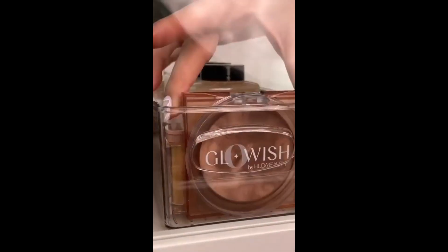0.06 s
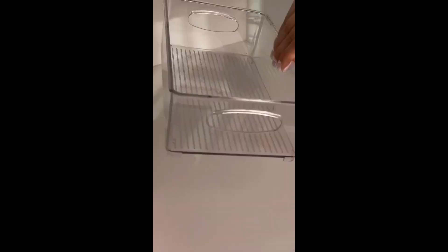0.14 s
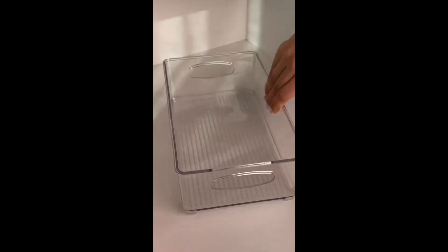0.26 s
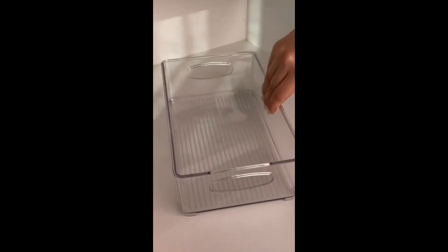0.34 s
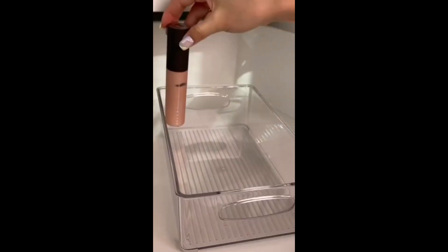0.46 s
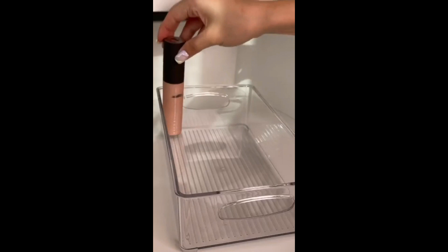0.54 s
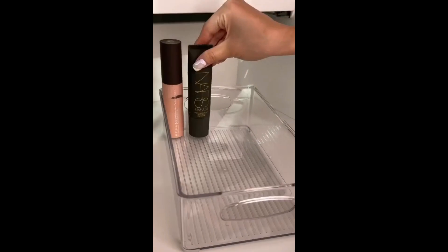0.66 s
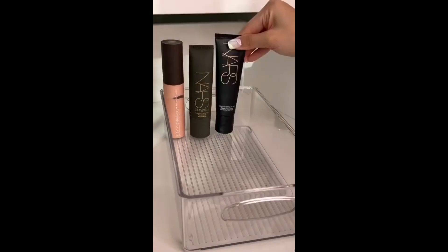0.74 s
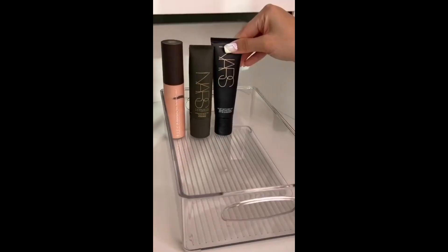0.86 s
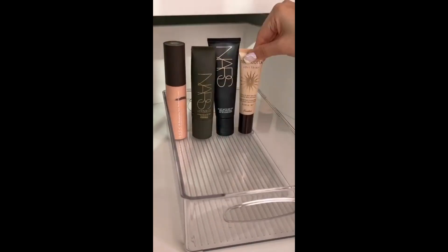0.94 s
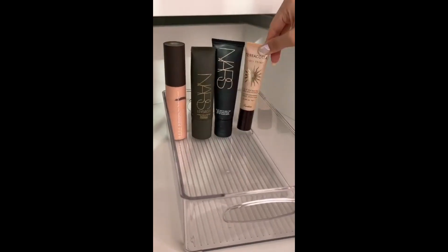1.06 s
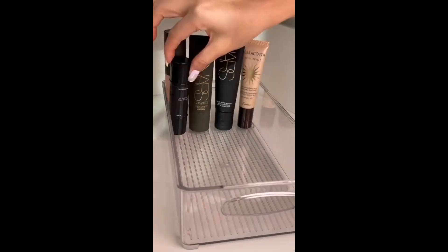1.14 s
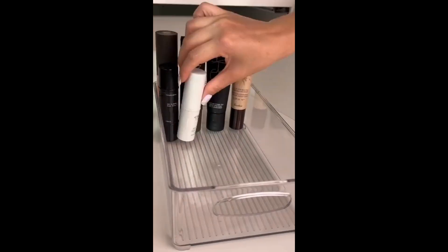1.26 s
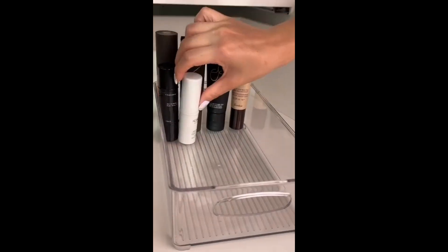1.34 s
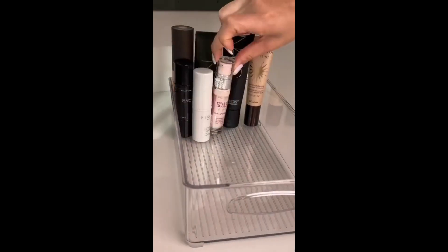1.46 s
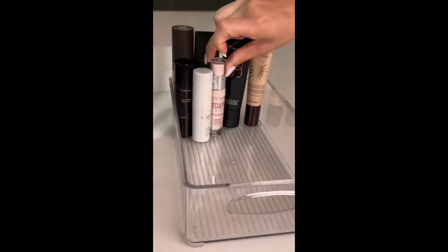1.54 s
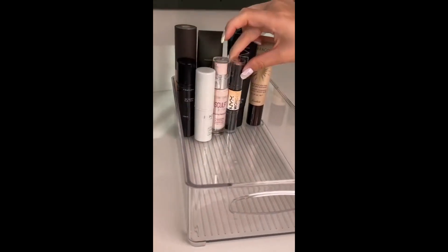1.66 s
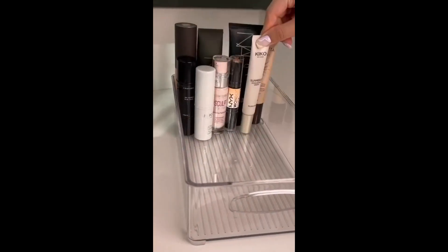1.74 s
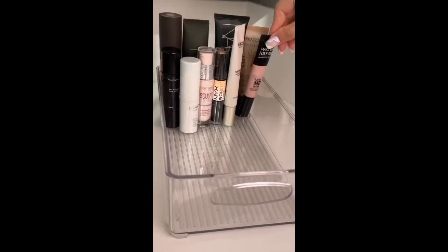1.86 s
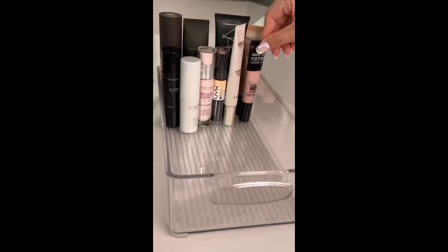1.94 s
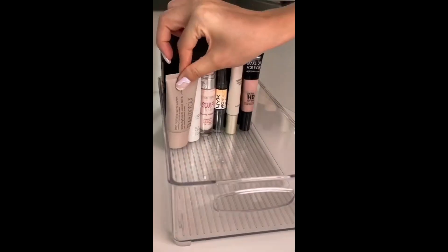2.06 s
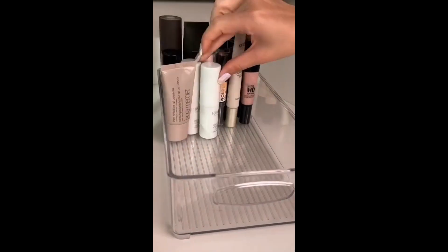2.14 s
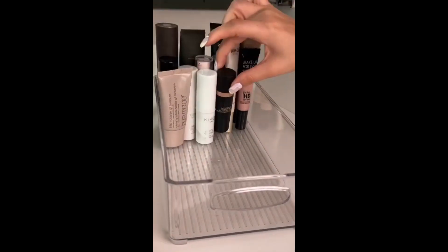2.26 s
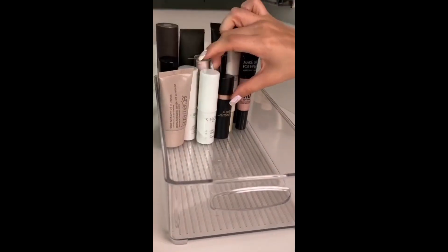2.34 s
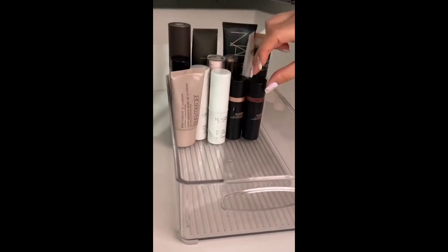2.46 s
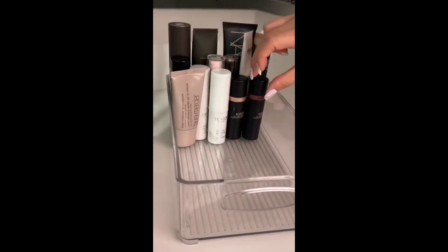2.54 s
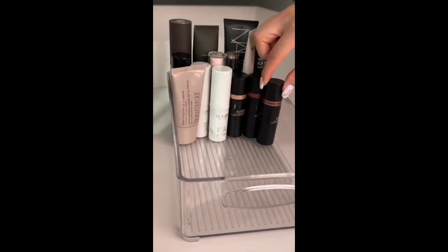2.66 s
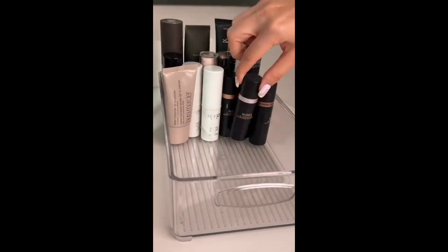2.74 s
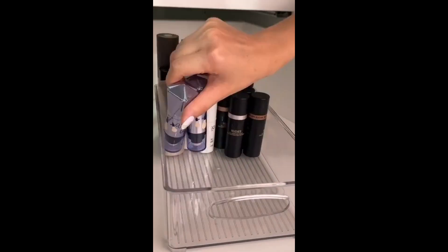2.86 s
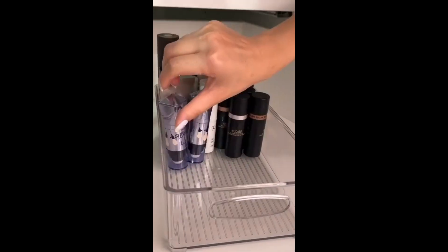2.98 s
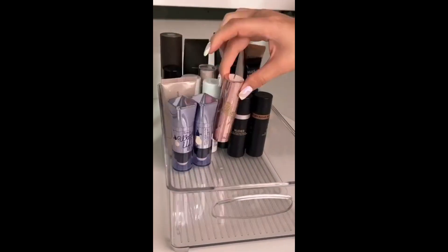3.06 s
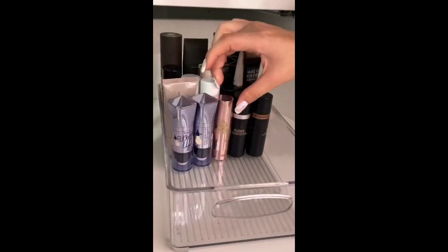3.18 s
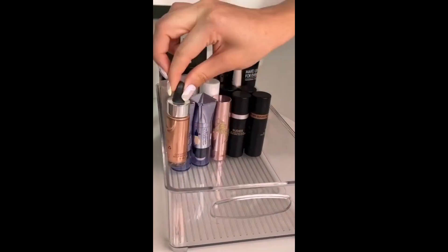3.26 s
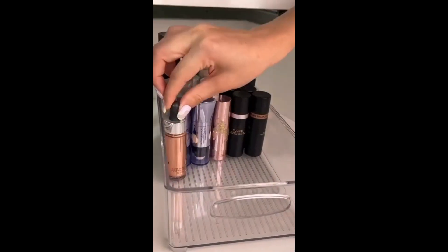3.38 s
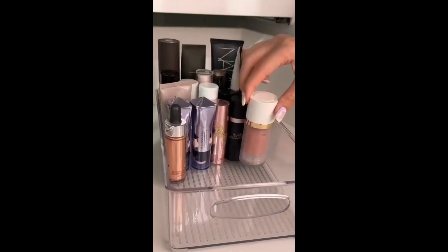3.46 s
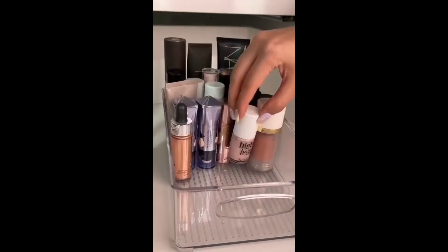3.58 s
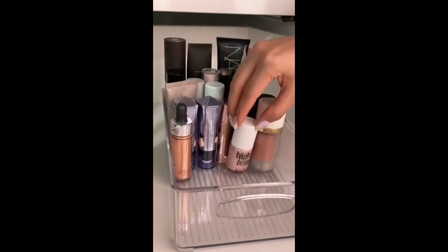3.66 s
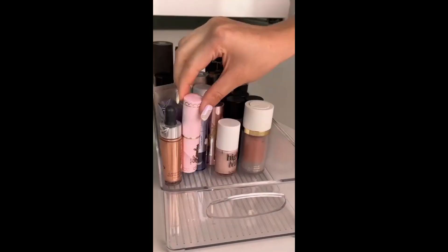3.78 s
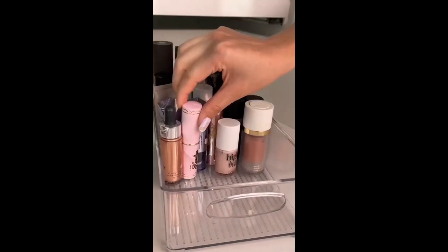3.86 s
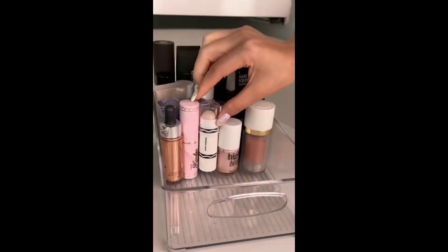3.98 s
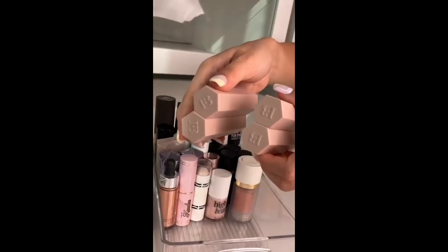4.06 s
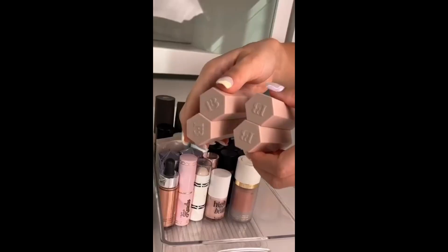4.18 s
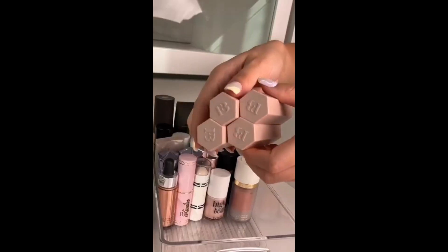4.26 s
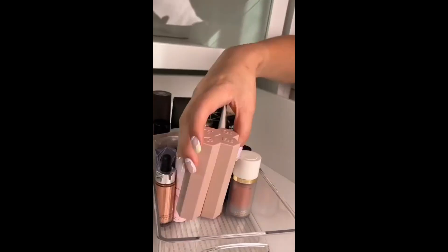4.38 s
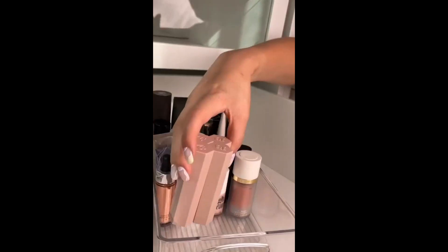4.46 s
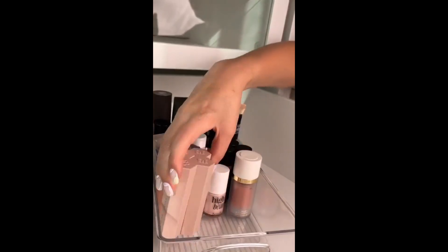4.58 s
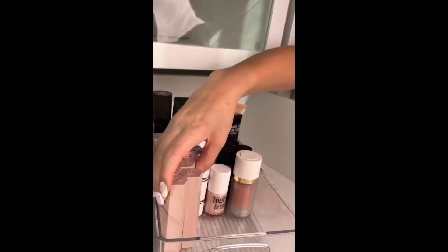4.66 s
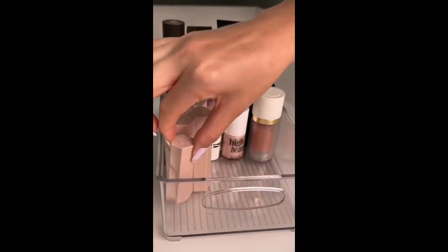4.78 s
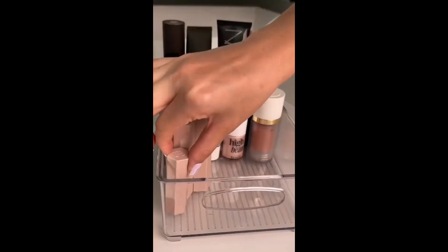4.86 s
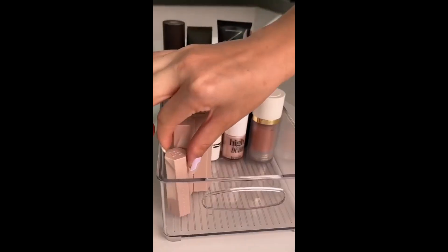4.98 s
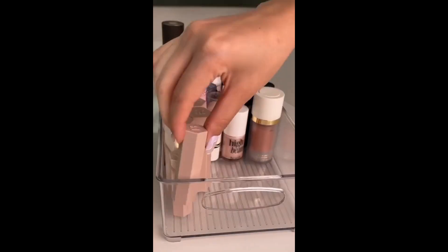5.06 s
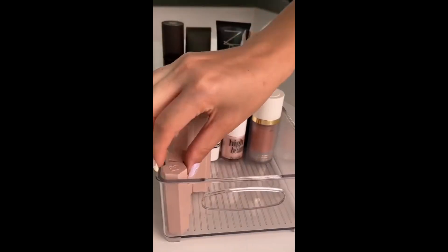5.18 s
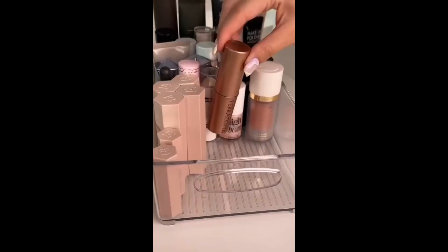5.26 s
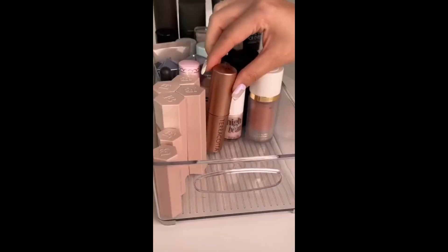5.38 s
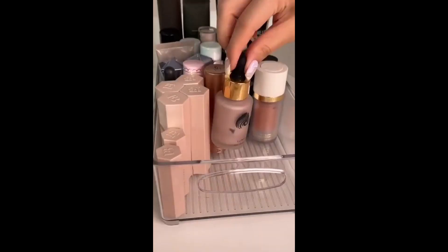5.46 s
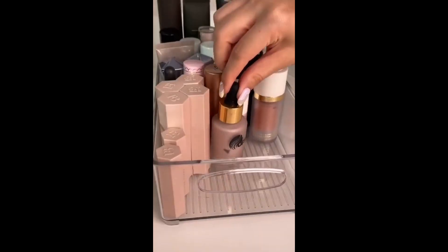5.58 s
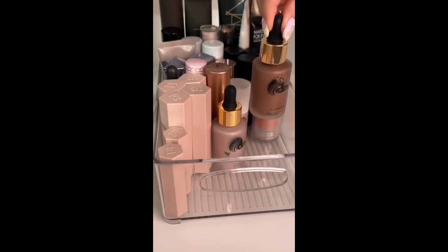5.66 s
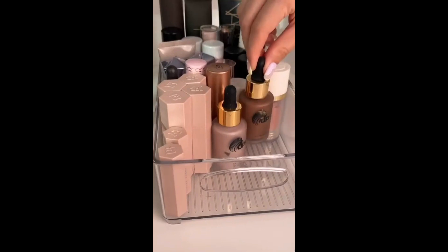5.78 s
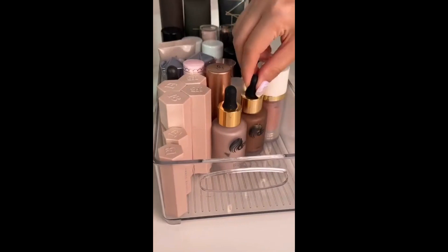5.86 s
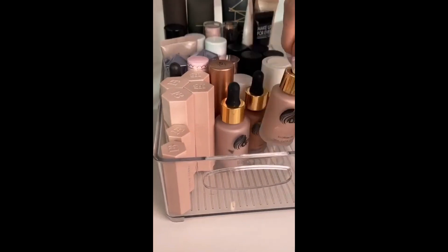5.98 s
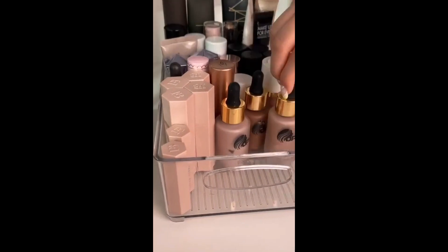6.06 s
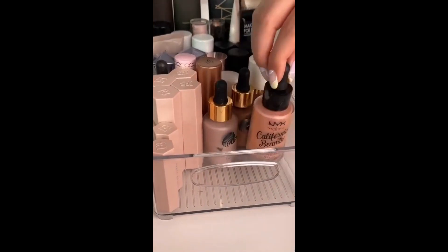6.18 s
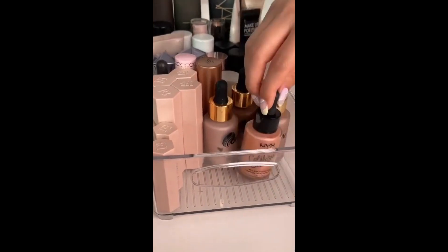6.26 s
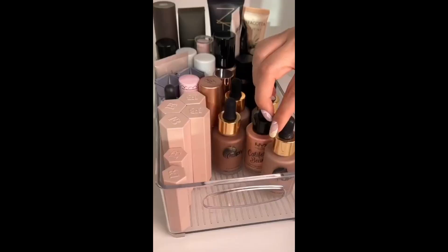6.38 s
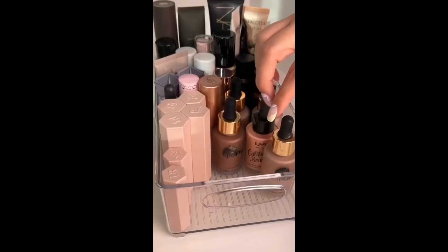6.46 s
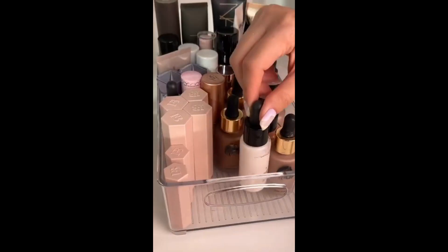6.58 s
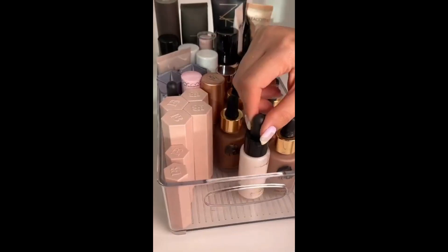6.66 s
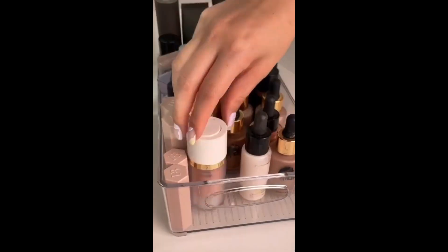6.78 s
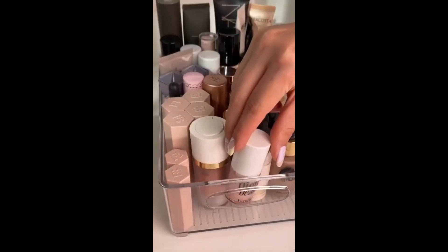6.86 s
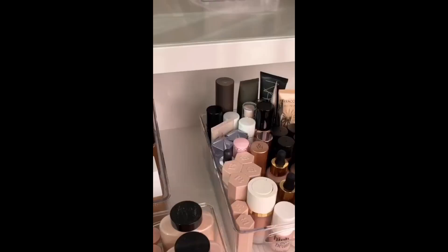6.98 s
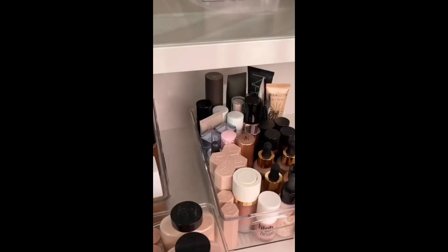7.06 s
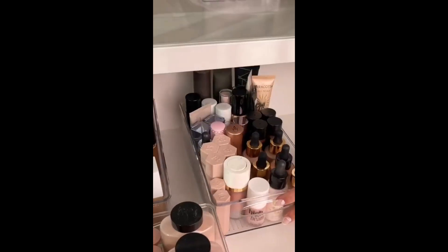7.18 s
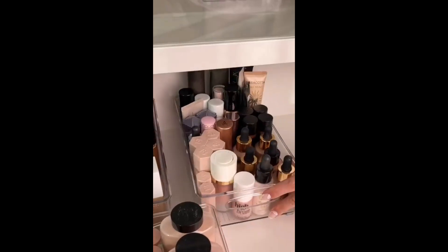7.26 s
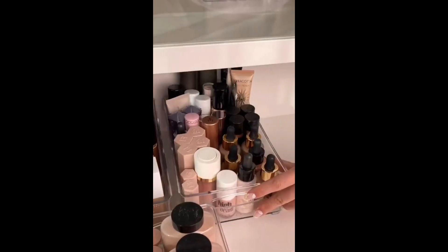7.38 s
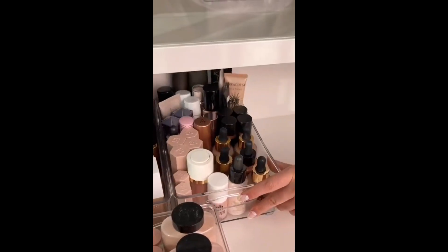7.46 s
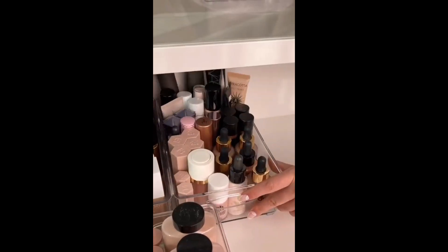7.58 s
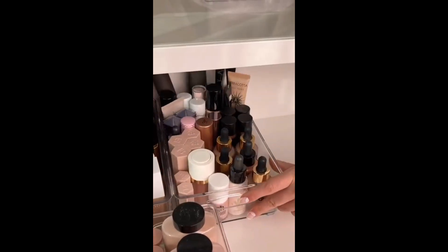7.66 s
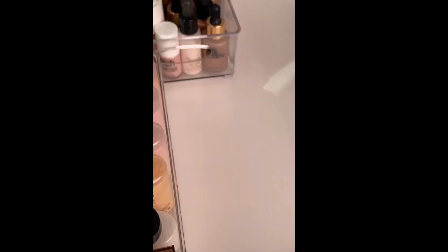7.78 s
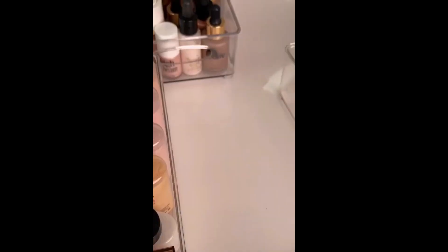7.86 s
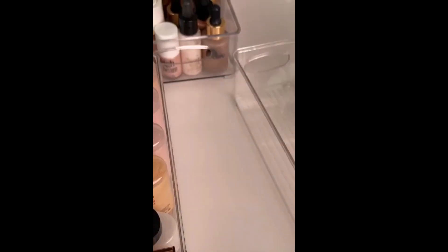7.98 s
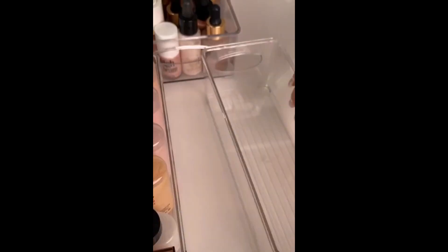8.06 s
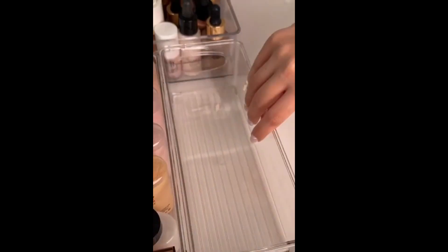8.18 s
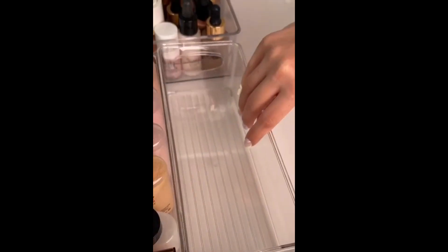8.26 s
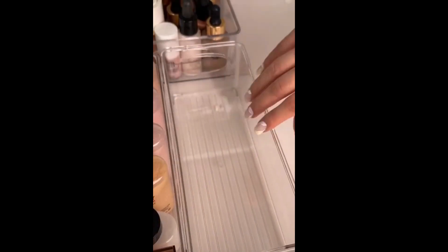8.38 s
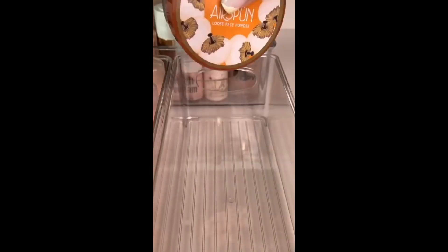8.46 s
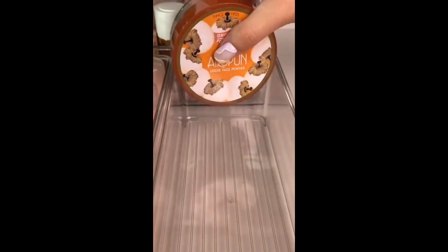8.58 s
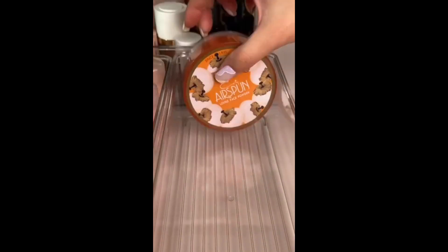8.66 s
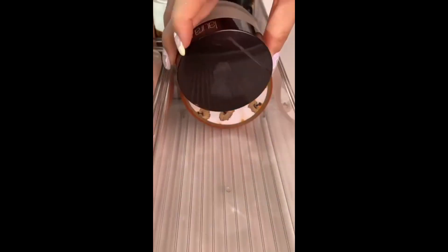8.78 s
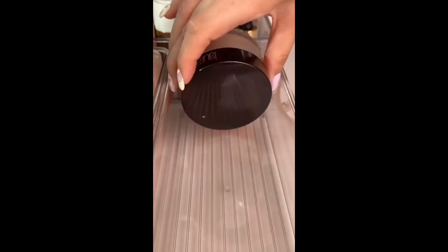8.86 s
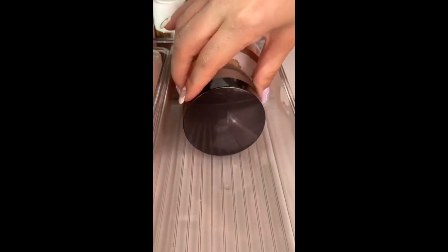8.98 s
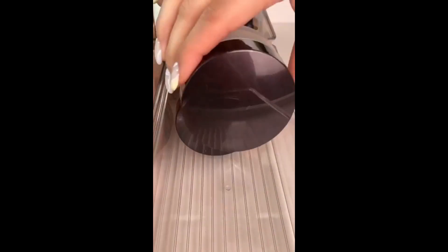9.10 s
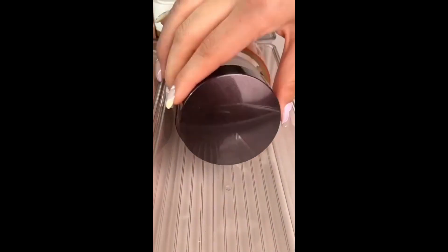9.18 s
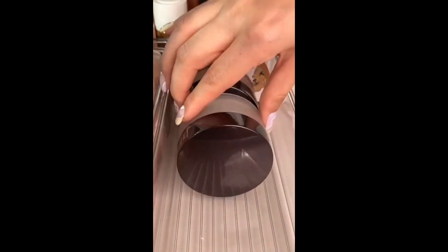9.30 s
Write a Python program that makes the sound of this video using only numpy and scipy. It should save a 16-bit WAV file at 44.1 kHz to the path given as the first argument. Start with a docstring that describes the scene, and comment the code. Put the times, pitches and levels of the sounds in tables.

```python
"""Glass and plastic cosmetic bottles knock one by one into a ribbed plastic bin on a shelf, close to a phone.
Each knock cracks, clacks, thuds the bin and decays through dense modes; splices cut the rings short.
Glass clinks and a very high hiss lie over some knocks; filtered noise makes the drags of bottles and bins.
Quiet room air lies beneath; the phone's limiter holds the loud knocks at one level."""
import sys
import numpy as np
from scipy import signal
from scipy.fft import rfft, irfft, next_fast_len
from scipy.io import wavfile
from scipy.ndimage import uniform_filter1d, minimum_filter1d

SR = 44100
rng = np.random.default_rng(int(sys.argv[2]) if len(sys.argv) > 2 else 0)


def generate_wav(sig):
    """Save sig (samples, or channels by samples) to the path in sys.argv[1] as 16-bit PCM at SR."""
    pcm = np.round(np.clip(np.atleast_2d(sig).T, -1, 1) * 32767).astype(np.int16)
    wavfile.write(sys.argv[1], SR, pcm)


N = 411453  # length in samples


def amp(db):
    """dB to gain."""
    return np.exp(np.asarray(db) * np.log(10) / 20)


def unit(x):
    """x at rms 1."""
    return x / np.sqrt(np.mean(x ** 2, axis=-1, keepdims=True))


def shaped(x, gain):
    """x times a gain that depends on frequency."""
    size = next_fast_len(N, real=True)
    hz = np.fft.rfftfreq(size, 1 / SR) + 1  # 1 Hz up, so that its log exists
    return irfft(rfft(x, size) * gain(hz), size)[..., :N]


def spectrum(points):
    """The gain through (Hz, dB) points on a log frequency axis."""
    f, db = np.transpose(points)
    return lambda hz: amp(np.interp(np.log(hz), np.log(f), db))


def lumps(size, count):
    """A smooth random curve of rms 1 that changes every size samples or so."""
    noise = rng.standard_normal(count)
    return unit(uniform_filter1d(uniform_filter1d(noise, size), size))


def streaky(x, streak_db):
    """x with narrow resonances that come and go."""
    z = signal.stft(x, nperseg=512)[2]
    streaks = uniform_filter1d(rng.standard_normal(z.shape), size=3, axis=-2)
    streaks = uniform_filter1d(streaks, size=16, axis=-1)
    return signal.istft(z * amp(streak_db * streaks / streaks.std()), nperseg=512)[1][..., :N]


def ring(modes, t, scatter_db, rise_cycles=0.83):
    """Damped modes of random strength; each builds up over its own cycles, so the low ones come late."""
    hz, db, t60 = np.transpose(modes)[..., None]
    decay = amp(db + scatter_db * rng.standard_normal(hz.shape) - 60 * t / t60)
    rise = 1 - np.exp(-(hz * t / rise_cycles) ** 2)
    return np.sum(decay * np.sin(2 * np.pi * hz * t) * rise, axis=0)


def add(track, s, sound):
    """Lays a sound in at s seconds; the next splice ends it with a short fade."""
    # splices between shots: t/s
    splices = [.203, .563, .843, 1.363, 1.683, 1.803, 2.523, 2.723, 2.843, 3.003, 3.555, 3.683, 3.883,
               4.123, 4.483, 5.763, 6.003, 6.203, 6.603, 8.523, 8.843, 9.123]
    end = min(c for c in splices + [np.inf] if c > s + .004)
    left = end - s - np.arange(len(sound)) / SR
    track[round(s * SR):][:len(sound)] += sound * np.clip(left / 0.0031, 0, 1)


def room_air(level_db=-62.5):
    """The quiet air of the room: steady noise, strongest in the bass."""
    # tilt of the air: f/Hz, relative level/dB
    tilt = [(30, -1), (75, 11), (266, -11.5), (6900, -36), (16000, -48.5)]
    return amp(level_db) * unit(shaped(rng.standard_normal(N), spectrum(tilt)))


def slides(grain_db=1.5, judder_db=1.1, streak_db=2.2, hollow_width_hz=75):
    """Dragging over the shelf: tiny uneven catches, a judder, and narrow resonances that come and go."""
    # bins and bottles dragged along, one list for each drag, the empty bin last: t/s, level/dB
    drags = [
        [(6.27, -65), (6.32, -35.5)],
        [(7.075, -47), (7.2, -45), (7.4, -49), (7.5, -49), (7.56, -34.5), (7.64, -59), (7.79, -59)],
        [(7.8, -68), (7.88, -45.5), (8.11, -44.5), (8.3, -51.5)],
    ]
    # scrape of plastic on the shelf: f/Hz, relative level/dB
    scrape_tilt = [(35, -45.5), (60, -49), (220, -6.5), (1400, -6.5), (5590, -17), (16000, -36.5)]
    # resonances of the empty bin's walls: f/Hz, level/dB
    hollow = [(208, 11), (431, 7), (600, 5), (836, 7)]
    t = np.arange(N) / SR
    *loaded, empty = [amp(np.interp(t, *np.transpose(rows), left=-120, right=-120)) for rows in drags]
    roughness_db = grain_db * lumps(size=40, count=N) + judder_db * lumps(size=500, count=N)
    catches = rng.standard_normal(N) * amp(roughness_db)

    def empty_bin(hz):
        """Gain of the hollow walls, and of the bare edges, which hiss."""
        walls = 1 + sum(amp(db) / (1 + (2 * (hz - f) / hollow_width_hz) ** 2) for f, db in hollow)
        return walls + 1.1 * np.exp(-np.log2(hz / 6500) ** 2)

    scrape = shaped(streaky(catches, streak_db), spectrum(scrape_tilt))
    return sum(loaded) * unit(scrape) + empty * unit(shaped(scrape, empty_bin))  # a load damps the walls


def high_hiss(track, t):
    """Very high hiss over some knocks: many random damped sines close together."""
    # very high hiss at some knocks: lowest f/Hz, highest f/Hz, t60/s
    low_hz, high_hz, hiss_t60 = (13000, 23000, 0.17)
    # when it sounds: t/s, level/dB
    hiss_times = [(5.841, -59), (5.868, -57), (5.906, -66), (6.093, -59)]
    for s, db in hiss_times:
        sines = [(f, 0, hiss_t60) for f in rng.uniform(low_hz, high_hz, size=110)]
        add(track, s, amp(db) * ring(sines, t, scatter_db=2))


def glass_touches(track, t):
    """Glass bottles touching: a few sparse damped modes."""
    # dropper bottles: f/Hz, level/dB, t60/s
    dropper = [(12920, -5, .09), (13610, 0, .13)]
    # glass touches glass: t/s, level/dB
    clink_times = [(6.241, -46), (6.32, -52), (6.642, -40), (6.684, -49)]
    # one bottle sings lower: t/s, f/Hz, level/dB, t60/s
    ping = (6.642, 4613, -39, .14)
    # thick glass bottle: f/Hz, level/dB, t60/s
    flask = [(3560, 3, 0.03), (3870, 3, 0.038), (5530, -8, 0.034)]
    # the thick bottle touches its neighbours: t/s, level/dB
    clonk_times = [(6.04, -27), (6.097, -27)]
    for s, db in clink_times:
        add(track, s, amp(db) * ring(dropper, t, scatter_db=2))
    add(track, ping[0], ring([ping[1:]], t, scatter_db=2))
    for s, db in clonk_times:
        add(track, s, amp(db) * ring(flask, t, scatter_db=2))


def contacts(tick_drop_db=16, rattle_db=2.0):
    """All contacts as rows for knocks(); the item in hand sets weight, brightness, sizzle and ring time."""
    # firm knocks: t/s, level/dB, thud of the bin/dB, pitch of the object's clack f/Hz
    firm = [(0.061, -16.5, -15, 817), (0.229, -36.5, 1, 805), (0.33, -27, -5.5, 1650),
            (0.357, -27.5, -15.5, 2550), (0.58, -28, -9, 445), (0.748, -29, -10, 693),
            (0.879, -30.5, -7.5, 3730), (1.028, -32.5, -4, 4660), (1.12, -38.5, 2.5, 1060),
            (1.17, -24, -7, 800), (1.271, -25, -7, 1850), (1.392, -21.5, -12, 834), (1.567, -25, -10, 1230),
            (1.714, -31, -10, 1050), (1.838, -29, -17, 1420), (1.925, -35.5, -17, 3580),
            (1.975, -24, -13.5, 554), (2.114, -23.5, -16.5, 640), (2.23, -22, -17.5, 776),
            (2.266, -36, -10, 1410), (2.367, -16, -19, 632), (2.422, -30.5, -12.5, 1440),
            (2.536, -24.5, -17.5, 1130), (2.584, -34, -13, 2180), (2.737, -27.5, -5.5, 1450),
            (2.855, -25.5, -10, 1550), (3.011, -23.5, -14, 1450), (3.029, -29, -10.5, 765),
            (3.211, -25, -13, 1200), (3.257, -38, -44, 1260), (3.407, -24.5, -8.5, 1720),
            (3.573, -24, -10, 890), (3.732, -25, -12.5, 764), (3.893, -24.5, -15, 1370),
            (4.078, -28.5, -14, 1610), (4.299, -37, -36, 2410), (4.332, -33.5, -36, 2440),
            (4.653, -23.5, -21.5, 1110), (4.681, -30.5, -16, 2950), (4.7, -18.5, -17, 1570),
            (4.901, -22.5, -14.5, 1110), (5.009, -34.5, -7, 1070), (5.2037, -30, -19.5, 2950),
            (5.247, -20, -15.5, 1340), (5.419, -25, -11, 1460), (5.437, -25, -23, 1480),
            (5.559, -44, -2, 1380), (5.661, -18.5, -13.5, 892), (5.793, -44, -16.5, 2360),
            (5.842, -30, -22, 4630), (5.868, -33.5, -14, 3240), (5.905, -21.5, -18.5, 785),
            (6.096, -28, -13.5, 4000), (6.138, -25.5, -16.5, 933), (6.241, -33.5, -8, 1750),
            (6.32, -24.5, -14.5, 1710), (6.444, -37.5, -13, 1770), (6.641, -33, -29, 3200),
            (6.683, -23, -16.5, 3260), (6.834, -23, -20, 1410), (6.949, -42.5, -9, 1500),
            (7.001, -22, -18.5, 1096), (7.161, -38, -31, 1580), (7.174, -34.5, -11.5, 820),
            (7.395, -32, -9, 2770), (7.401, -25.5, -39, 1520), (8.282, -18.5, -17.5, 886),
            (8.454, -32.5, -10.5, 826), (8.611, -15.5, -15, 870), (8.682, -23, -14.5, 784),
            (8.72, -30.5, -8.5, 970), (8.734, -25, -13.5, 1540), (8.892, -30, -14.5, 1166),
            (8.991, -26, -18.5, 1133), (9.173, -37, -9.5, 448), (9.213, -25.5, -35, 2170),
            (9.233, -34, -24, 2170), (9.259, -29.5, -18, 686), (9.283, -27.5, -17, 2150),
            (9.297, -16.5, -19, 1750)]
    # drawn-out rubs on ribs and neighbours: t/s, level/dB, thud/dB, f/Hz, brightness over the item's/dB
    rubs = [(0.02, -47.5, -11, 1480, 0), (0.039, -34.5, -16, 686, -5), (0.999, -40.5, -15, 3030, -8),
            (3.361, -42.5, -7, 6730, 0), (3.7, -41, -12.5, 4000, 1.5), (4, -44.5, -3, 1153, 5),
            (4.039, -39, -29, 1060, 1), (4.621, -36, -11, 1100, 4), (5.141, -39.5, -14, 1030, -13),
            (5.598, -46, -12, 3273, 7.5), (6.0763, -27, -19.5, 790, -2.5), (6.481, -38.5, -23, 1420, -3),
            (7.427, -41, -23, 2720, 5), (7.527, -21, -21.5, 1630, 1), (8.932, -33.5, -11, 1270, -1)]
    # every rub: ring t60/s, rattle/dB
    rub = (0.29, 3.5)
    # soft, dull bumps in which one hollow note rings: t/s, level/dB, f/Hz
    bumps = [(0.652, -29, 267), (0.671, -32.5, 556), (2.679, -49.5, 780), (6.141, -35, 240),
             (6.491, -37.5, 173), (7.918, -36.5, 196), (7.952, -37.5, 815), (8.233, -46.5, 890),
             (8.39, -45, 900), (8.445, -39.5, 1070), (8.632, -35.5, 727), (9.225, -38.5, 1130),
             (9.24, -36.5, 1210)]
    # every bump: thud/dB, brightness over the item's/dB, cycles it rings
    bump_thud_db, bump_over_db, bump_cycles = (-13, -18.5, 38)
    # light touches of nails, caps and neighbours:
    # t/s, level/dB, lowered for every light touch by tick_drop_db, f/Hz
    ticks = [(1.54, -29.5, 2450), (1.702, -29, 1210), (2.031, -34, 2410), (2.206, -34.5, 3480),
             (2.607, -36, 2500), (3.057, -25.5, 3470), (3.116, -35.5, 4800), (3.194, -35.5, 1100),
             (3.327, -28.5, 2760), (3.341, -25.5, 2440), (3.381, -26, 2470), (3.516, -35.5, 3380),
             (3.85, -32.5, 1190), (4.015, -24.5, 1150), (4.31, -25, 3310), (4.84, -44.5, 3240),
             (5.156, -38, 2720), (5.951, -29, 2440), (6.04, -23.5, 3700), (6.089, -20.5, 2480),
             (6.881, -34.5, 1990), (6.921, -25.5, 1017), (7.024, -25, 1520), (7.683, -28, 1330),
             (7.705, -29.5, 3200), (7.512, -26, 3000), (7.579, -18.5, 7000), (7.829, -29, 1620),
             (8.318, -21, 4900), (8.419, -31.5, 925)]
    # every light touch: thud/dB, brightness over the item's/dB, ring t60/s, note over a knock's clack/dB
    tick_thud_db, tick_over_db, tick_t60, tick_note_db = (-16, 1.3, 0.2, 2.5)
    # what is being handled: from t/s, deep-bass weight/dB, brightness/dB, top-band sizzle/dB, ring t60/s in
    # order: compact and tubes, first bottle, first bottle and tube, soft tubes, slim sticks, capped bottles,
    # six-sided sticks in the hands, then as a bundle, then one by one, glass droppers, smaller glass bottles,
    # pump bottle, full bin, empty bin, wide jar, second jar
    items = [(0, -10, -21.5, 2.5, 0.13), (.2, -5.5, -15, -1, 0.25), (.55, 4, -18.5, -9, 0.2),
             (.85, -2, -16, 0.5, 0.16), (1.5, 3.5, -17.5, 1, 0.15), (2.5, -2, -17, 3, 0.21),
             (4.2, -10, -5.5, 7, 0.11), (4.55, -2.5, -17, 5, 0.14), (4.89, -4.5, -17.5, -2.5, 0.15),
             (5.75, 0.5, -16, 1, 0.15), (6.2, 2, -14.5, 0, 0.15), (6.75, 8.5, -12.5, -1, 0.096),
             (7.1, 5.5, -15.5, -2.5, 0.2), (7.75, -2.5, -16, -4, 0.27), (8.55, -1.5, -23, 1, 0.17),
             (9.15, -11, -24.5, 5.5, 0.099)]

    def row(s, db, thud_db, hz, over_db=0, t60=None, rattle_db=rattle_db, note_db=0):
        """One contact, coloured by the item handled at that time."""
        _, weight_db, bright_db, sizzle_db, item_t60 = [item for item in items if item[0] <= s][-1]
        return s, db, thud_db, weight_db, bright_db + over_db, sizzle_db, rattle_db, note_db, hz, t60 or item_t60

    rows = [row(*knock) for knock in firm]
    rows += [row(*r, *rub) for r in rubs]
    rows += [row(s, db, bump_thud_db, hz, bump_over_db, bump_cycles / hz, note_db=7) for s, db, hz in bumps]
    rows += [row(s, db - tick_drop_db, tick_thud_db, hz, tick_over_db, tick_t60, note_db=tick_note_db)
             for s, db, hz in ticks]
    return rows


def bin_thud(t, level_db, weight_db):
    """The bin's low damped modes; the item's weight shifts the level of those under 150 Hz."""
    # the bin: f/Hz, level/dB, t60/s
    bin_modes = [(81.1, -8, 0.16), (127.6, -5, 0.11), (170.1, -9.5, 0.16), (245.5, -3.5, 0.087),
                 (409.6, -0.5, 0.056)]
    loaded = [(f, level + weight_db * (f < 150), t60) for f, level, t60 in bin_modes]
    return amp(level_db) * ring(loaded, t, scatter_db=5, rise_cycles=0.65)


def object_clack(t, clack_hz, level_db, bright_db):
    """The object's own note, which rings a set number of cycles as plastic does, and seven random modes."""
    note = ring([(clack_hz, level_db, 44 / clack_hz)], t, scatter_db=1.5, rise_cycles=0.87)
    overtone_db = 7 + min(bright_db, -16)  # dull contacts hardly reach the other modes
    overtone_hz = np.exp(rng.uniform(np.log(1050), np.log(5000), size=7))
    return note + ring([(f, overtone_db, 55 / f) for f in overtone_hz], t, scatter_db=6.5)


def knocks(room_db=-25, room_t60=0.84, crack_db=9, crack_t60=0.032, clack_db=-4, hump_db=5, bin_db=6,
           dense_db=-11, snap_db=12, snap_t60=0.019):
    """Each contact cracks, clacks, thuds the bin and leaves a dense decay and the shelf's echo (t60 in s)."""
    # the many close modes of bin and bottle, by band: f/Hz, level/dB, share of the ring time
    dense_modes = [(154.2, 12.5, 0.95), (291.5, 12.5, 1.017), (578.6, 6.5, 0.85), (981, -4, 0.69),
                   (1588, -2.5, 0.64), (2880, 4.5, 0.51), (4470, 11, 0.44), (6670, 5, 0.5),
                   (11000, 0.5, 0.48)]
    track, t = np.zeros(N + SR), np.arange(round(.23 * SR)) / SR
    hz, band_db, share = np.transpose(dense_modes)[..., None]
    # narrow resonances come and go in the noise, different at each contact
    modal = streaky(rng.standard_normal((len(hz), N)), streak_db=2.8)
    bands = unit(shaped(modal, lambda f: np.exp(-(np.log2(f / hz) / .5) ** 2)))
    low = np.clip(np.log2(900 / hz), 0, 1)  # share of the thud in each band
    high = np.clip(np.log2(hz / 2300), 0, 1)  # share of the brightness
    swell = 1 - np.exp(-(t / (1.24 / hz + 0.00064)) ** 2)  # low modes take a cycle or two to build up
    crack = swell * amp(crack_db - 60 * t / crack_t60) * (1 - low)
    crack = crack + swell * amp(snap_db - 60 * t / snap_t60) * high  # the treble snaps first
    # the shelf's echo, stronger above the bass
    echo = swell * amp(room_db + 3.5 * (1 - low) - 60 * t / (room_t60 * share ** .7))
    for s, db, thud_db, weight_db, bright_db, sizzle_db, rattle_db, note_db, clack_hz, t60 in contacts():
        t60 = np.clip(t60, .02, 1)
        colour_db = band_db + low * thud_db + high * bright_db
        colour_db = colour_db + (hz == hz.max()) * sizzle_db + (hz == hz.min()) * weight_db
        # the object favours its own pitch
        colour_db = colour_db + (hump_db + note_db) * np.exp(-(np.log2(hz / clack_hz) / 1.04) ** 2)
        rattle = amp(rattle_db * lumps(size=90, count=len(t)))  # it rocks on the ribs as it settles
        hardness = amp(-40 * t60)  # the longer the ring time, the less crack
        decay = rattle * (hardness * crack + swell * amp(-60 * t / (t60 * share))) + echo
        start = rng.integers(N - len(t))
        dense = amp(dense_db + colour_db[:, 0]) @ (decay * bands[:, start:start + len(t)])
        clack = object_clack(t, clack_hz, clack_db + note_db, bright_db)
        thud = bin_thud(t, thud_db + bin_db, weight_db)
        add(track, s - .0006, amp(db) * (dense + clack + thud))
    high_hiss(track, t)
    glass_touches(track, t)
    return track[:N]


def scene():
    """Room air, the drags along the shelf, and the knocks close to the microphone."""
    return (room_air() + slides() + knocks())[None]


def record(dry, ceiling_db=-17.8, top_hz=15850):
    """The microphone drops the deep bass; a fast limiter, then the band limit."""
    dry = signal.sosfilt(signal.butter(2, 38, "high", fs=SR, output="sos"), dry)
    needed = np.minimum(1, amp(ceiling_db) / (np.abs(dry) + 1e-9))
    # the gain dips just ahead of each peak and moves smoothly
    gain = uniform_filter1d(minimum_filter1d(needed, size=160, axis=1), size=120, axis=1)
    return shaped(dry * gain, lambda hz: amp(-np.clip(hz - top_hz, 0, None) / 14))  # 1 dB less every 14 Hz


dry = scene()
out = record(dry)
generate_wav(out)
```